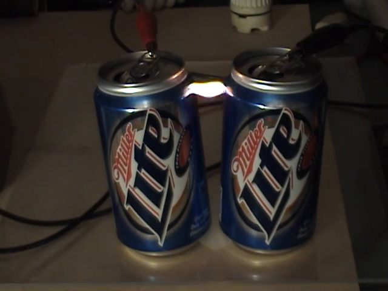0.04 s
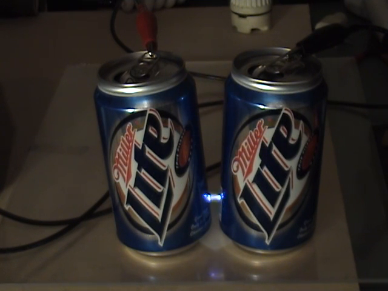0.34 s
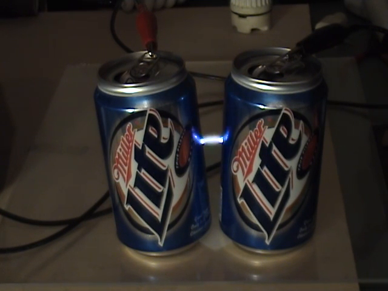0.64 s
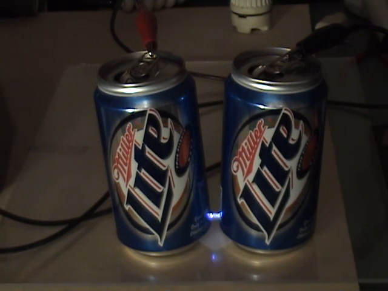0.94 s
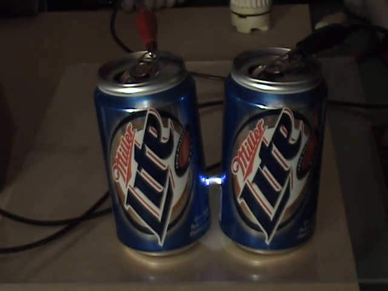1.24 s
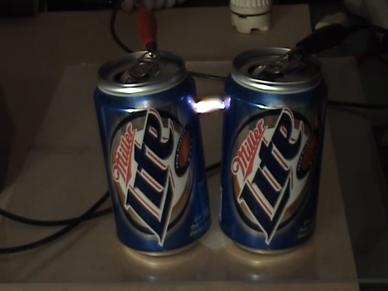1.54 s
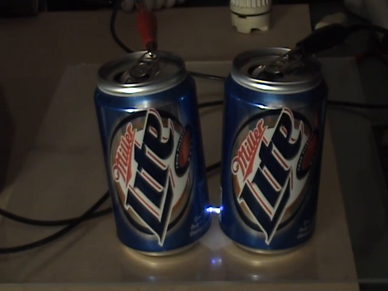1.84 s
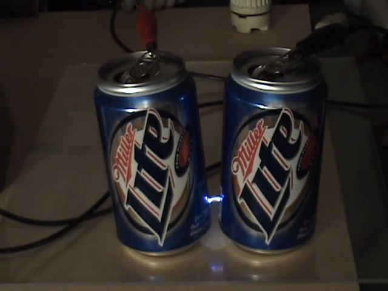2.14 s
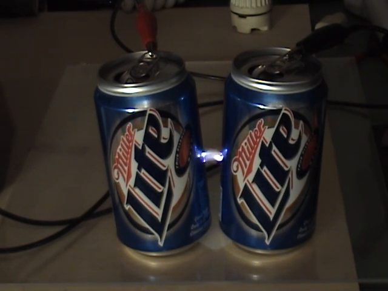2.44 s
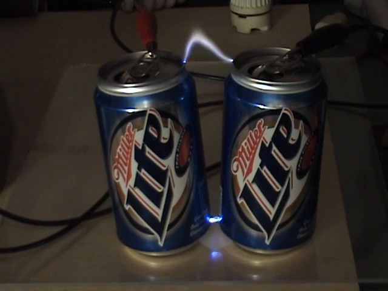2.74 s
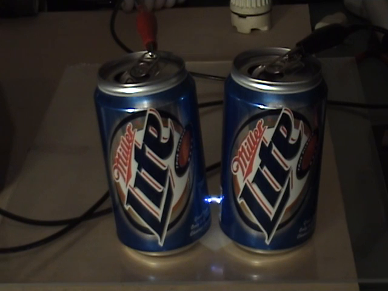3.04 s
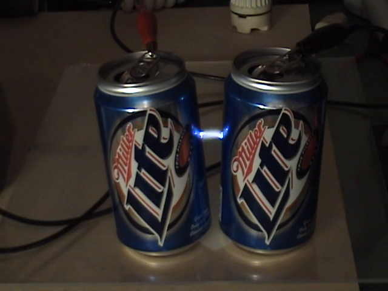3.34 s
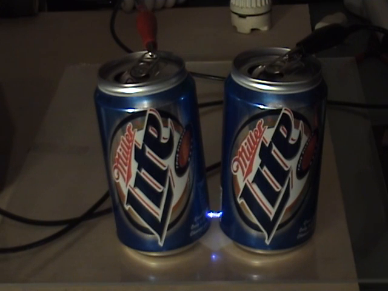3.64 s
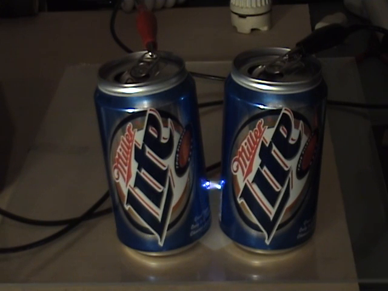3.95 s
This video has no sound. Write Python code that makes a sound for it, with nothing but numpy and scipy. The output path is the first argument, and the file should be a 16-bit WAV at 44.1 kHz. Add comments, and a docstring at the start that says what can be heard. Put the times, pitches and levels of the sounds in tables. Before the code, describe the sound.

A harsh electric arc buzzes, swelling and cutting off with a pop about once a second.

```python
"""A high-voltage mains arc, already high in the widening gap between two metal cans, snaps with a dry pop.
It strikes again at the bottom and climbs, re-ignited in each half cycle by a short burst of sparks.
As it lengthens the sparks spread apart, the buzz grows louder and lower, and a hum swells, until it
snaps again. This repeats about once a second, and the last climb is still under way at the end.
Now and then the cans tick; throughout, a small room with a faint steady rush surrounds it all."""
import sys
import numpy as np
from scipy import signal
from scipy.fft import rfft, irfft
from scipy.io import wavfile

SR = 44100
rng = np.random.default_rng(int(sys.argv[2]) if len(sys.argv) > 2 else 0)


def dump_mix(stems):
    """Bounce the given channels to the path in sys.argv[1] as a 16-bit WAV at rate SR."""
    frames = np.atleast_2d(stems).T  # one column per channel
    limited = np.clip(frames, -1, 1)  # hard clip at full scale
    pcm = np.round(limited * 32767).astype(np.int16)
    wavfile.write(sys.argv[1], SR, pcm)


N = 176400
MAINS_HZ, FIRST_STRIKE_S, BAND_EDGE_HZ = 60.015, .00121, 16050

# Climbs of the arc. Each row: break time in seconds, time scale of the climb in seconds,
# relative level in dB, time to reach full strength in seconds.
CLIMBS = [(0.174, 1, -1.5, 0.55), (0.924, 0.37, 0, 0.2), (1.74, 0.39, 0, 0.18), (2.774, 0.35, .5, 0.24),
          (3.626, 0.35, -.5, 0.21), (4.476, 0.36, 2.5, 0.25)]
# Burst strength along a climb. Each row: height from 0 to 1, gain in dB.
HEIGHT_GAIN = [(0, -2), (.1, -3), (.35, 0), (.65, -2.5), (.85, -1.5), (1, 4)]
# Comb spectrum of a burst. Each row: multiple of the spark rate, gain in dB before depth scaling.
BURST_COMB = [(.2, -10), (.42, -9), (.58, -14), (.68, -6.5), (.74, -11.5), (.88, -3.5), (1.15, 0),
              (1.42, 0), (1.66, -7), (1.9, 0.5), (2.25, -0.5), (2.6, -1), (2.9, -10.5), (3.2, -3),
              (3.6, -6), (4.15, -11), (4.6, -4), (6, -12)]
# Colour of the sparks between the cans. Each row: frequency in Hz, gain in dB.
SPARK_COLOUR = [(100, -22.5), (400, -10), (900, -18.5), (1400, -3.5), (2000, -6), (2300, -5), (2900, -2),
                (4200, -2.5), (5800, 5), (6900, 0.5), (7800, -7), (8500, 3), (9500, 4.5), (10600, -1),
                (11150, 0.5), (11900, -7.5), (12500, -1.5), (14000, -7), (16000, -11)]
# Ticks of the cans. Each row: start in seconds, relative level in dB, centre frequency in Hz.
CAN_TICKS = [(0.4475, -25, 5180), (1.2455, -27, 5080), (2.2224, -13, 3350), (2.2317, -21.5, 3020),
             (3.09, -28.5, 4600)]
# Modes of a can. Each row: frequency in Hz, relative level in dB, time to fall 60 dB in seconds.
CAN_MODES = [(724, 15, 0.098), (1790, 10.5, 0.23), (1930, -2, 0.61), (2051, -1, 0.2), (2380, -14, .12),
             (2860, 15, 0.05), (3200, -10, 0.073), (4086, -25, .14), (4780, 14, 0.22)]
# Early reflections. Each row: delay in milliseconds, left gain in dB, right gain in dB.
REFLECTIONS = [(.76, -52, -39), (3.88, -43, -9.5), (4.12, -49.5, -9), (6.3, -42, -10.5)]
# Decay of the room's tail. Each row: frequency in Hz, time to fall 60 dB in seconds.
TAIL_T60 = [(200, 0.1), (2000, 0.46), (6000, 0.78), (15000, 0.02)]
# Spectrum of the tail. Each row: frequency in Hz, gain in dB.
TAIL_SPECTRUM = [(200, 6.5), (1200, 2.5), (3000, -12.5), (6000, -14), (10000, -10), (15000, -80.5)]
# Spectrum of the room noise. Each row: frequency in Hz, relative spectral density in dB.
RUSH_SPECTRUM = [(25, -10.5), (60, -9.5), (110, -10), (170, -3.5), (260, 1.5), (430, 1), (700, -1.5),
                 (1100, -6), (2200, -12), (4000, -4.5), (8000, -14.5), (16000, -10.5)]
# Likeness of its two channels. Each row: frequency in Hz, correlation from 0 to 1.
RUSH_CORRELATION = [(30, .1), (120, 0.27), (300, 0.9), (600, 0.76), (2000, 1), (16000, 1)]
# Its balance. Each row: frequency in Hz, left minus right level in dB.
RUSH_BALANCE = [(30, -9), (70, 2), (250, 3), (600, 5.5), (1500, 3)]
# Its tones. Each row: frequency in Hz, RMS level in dB.
RUSH_TONES = [(393.5, -56), (1034, -59)]


def amp(db):
    return 10 ** (np.asarray(db) / 20)


def unit_rms(x):
    return x / np.sqrt(np.mean(x ** 2) + 1e-20)


def curve_at(points, hz):
    f, value = np.transpose(points)
    return np.interp(np.log(hz + 1), np.log(f + 1), value)


def add(mix, start_s, sound):
    part = mix[max(round(start_s * SR), 0):][:len(sound)]
    part += sound[:len(part)]


def minimum_phase(gain_db):
    """Causal response: the phase follows from the log gain by the Hilbert transform."""
    return np.exp(np.conj(signal.hilbert(np.log(amp(gain_db)))))


def half_cycles():
    """An AC arc re-ignites twice a cycle. Gives each strike's time, height, age, level and break flag."""
    t = np.arange(FIRST_STRIKE_S, N / SR, 1 / (2 * MAINS_HZ))
    break_s, scale_s, climb_db, warm_s = np.transpose(CLIMBS)
    strike = np.arange(len(t))
    last_strikes = np.round((break_s - FIRST_STRIKE_S) * 2 * MAINS_HZ)
    climb = np.searchsorted(last_strikes, strike)
    height = np.exp(-(abs(break_s[climb] - t) / scale_s[climb]) ** 1.805)
    age = t - np.r_[-1, break_s][climb]
    fresh_db = -14.5 * np.clip(1 - age / warm_s[climb], 0, 1)  # a new arc starts weak
    level_db = climb_db[climb] + np.interp(height, *np.transpose(HEIGHT_GAIN)) + fresh_db
    return t, height, age, level_db, np.isin(strike, last_strikes)


def arc_buzz(bottom_ms=.087, top_ms=.372, settle_s=.067, treble_lag_s=.000312, comb_depth=1.15, size=256):
    """Interference: the sparks of a burst form a comb spectrum, which falls as their spacing grows."""
    t, height, age, level_db, breaks = half_cycles()
    spacing_noise, level_noise, time_noise = rng.standard_normal((3, len(t)))
    unsteady = height ** 4
    spacing_ms = bottom_ms + (top_ms - bottom_ms) * height ** 1.475
    spacing_ms *= 1 - .23 * np.exp(-age / settle_s)
    spacing_ms *= 1 + (.02 + .045 * unsteady) * spacing_noise
    polarity_ms = .066 * (np.arange(len(t)) % 2)  # every other burst lags
    lead_ms = 1.9 * (spacing_ms - bottom_ms)  # a long arc fires earlier
    starts = t + (polarity_ms + .018 * time_noise - lead_ms) / 1000
    misfires = rng.random(len(t)) < .03
    flicker_db = (.85 + 1.5 * unsteady) * level_noise - 4.5 * misfires
    level_db += np.where(breaks, 3, flicker_db)  # the burst at a break is stronger
    hz, bursts = np.fft.fftfreq(size, 1 / SR), np.zeros(N)
    for start, spacing_s, db in zip(starts, spacing_ms / 1000, level_db):
        frame_s = (round(start * SR) - size // 16) / SR
        sputter_db = 2 * np.interp(abs(hz), np.linspace(0, BAND_EDGE_HZ, 12), rng.standard_normal(12))
        comb_db = comb_depth * np.interp(abs(hz) * spacing_s, *np.transpose(BURST_COMB))
        delay_s = start - frame_s + treble_lag_s * abs(hz) / BAND_EDGE_HZ / 2
        spectrum = minimum_phase(comb_db + sputter_db) * np.exp(-2j * np.pi * hz * delay_s)
        burst = np.fft.ifft(spectrum * (abs(hz) < BAND_EDGE_HZ)).real
        add(bursts, frame_s, amp(db) * unit_rms(burst))
    colour_db = curve_at(SPARK_COLOUR, abs(np.fft.fftfreq(2048, 1 / SR)))
    colour_taps = np.fft.ifft(minimum_phase(colour_db)).real[:1024]
    return amp(-26) * unit_rms(signal.oaconvolve(bursts, colour_taps)[:N])


def break_pops(pop_ms=.158, puff_ms=2.1):
    """Compression, then rarefaction: each break gives a dry pop and a slower, soft puff of air."""
    out, ms = np.zeros(N), np.arange(1000) * 1000 / SR
    pop = amp(-11.5) * (1 - ms / pop_ms) * np.exp(-ms / pop_ms)
    puff = amp(-30.5) * (1 - ms / puff_ms) * np.exp(-ms / puff_ms)
    strike_s, *_, breaks = half_cycles()
    for start in strike_s[breaks]:
        add(out, start, pop + puff)
    return out


def arc_hum(bottom_db=-74, top_db=-60):
    """The hot channel pulses with the current at twice the mains frequency, more as it lengthens."""
    strike_s, height = half_cycles()[:2]
    t = np.arange(N) / SR
    level_db = np.interp(t, strike_s, bottom_db + (top_db - bottom_db) * np.sqrt(height))
    return amp(level_db) * unit_rms(np.cos(2 * np.pi * 2 * MAINS_HZ * (t - FIRST_STRIKE_S)))


def can_ticks(width_octaves=.66, crack_s=.01, rattle_s=.032):
    """Free vibration: a short crack leaves the thin metal ringing in its damped modes."""
    out, t = np.zeros(N), np.arange(SR // 2) / SR
    hz = np.fft.rfftfreq(len(t), 1 / SR)
    envelope = np.exp(-t / crack_s) + amp(-3) * np.exp(-t / rattle_s)
    high_pass = signal.butter(2, 600, 'high', fs=SR, output='sos')
    for start, db, centre_hz in CAN_TICKS:
        band = lambda f: np.exp(-.5 * (np.log2((f + 1) / centre_hz) / width_octaves) ** 2)
        crack = unit_rms(irfft(rfft(rng.standard_normal(len(t))) * band(hz))) * envelope
        ring = np.zeros(len(t))
        for mode_hz, mode_db, t60 in CAN_MODES:
            drive = max(np.sqrt(band(mode_hz)), .15) * rng.choice([-1, 1])
            ring += drive * amp(mode_db - 60 * t / t60) * np.sin(2 * np.pi * mode_hz * t)
        add(out, start, amp(db) * .5 * signal.sosfilt(high_pass, crack + amp(-18) * ring))
    return out


def room(source, width=.24):
    """Reverberation: direct sound, a few near reflections and a diffuse tail that decays exponentially."""
    hz, t, noise = signal.stft(rng.standard_normal((2, SR // 2)), SR, nperseg=256)
    decay = amp(-60 * t / curve_at(TAIL_T60, hz)[:, None])
    energy = (decay ** 2).mean(1, keepdims=True) * SR / 2
    decay *= amp(curve_at(TAIL_SPECTRUM, hz))[:, None] / np.sqrt(energy)
    mid, side = signal.istft(noise * decay, SR, nperseg=256)[1]
    response = np.array([mid + width * side, mid - width * side])
    response[:, 0] = 1  # direct sound
    for ms, left_db, right_db in REFLECTIONS:
        response[:, round(ms * SR / 1000)] += amp([left_db, right_db])
    return signal.fftconvolve(source[None], response, axes=1)[:, :N]


def room_rush():
    """Stationary noise, partly correlated between left and right, with two faint pure tones."""
    hz, t = np.fft.rfftfreq(N, 1 / SR), np.arange(N) / SR
    left, independent = rfft(rng.standard_normal((2, N)))
    correlation = np.clip(curve_at(RUSH_CORRELATION, hz), -1, 1)
    right = correlation * left + np.sqrt(1 - correlation ** 2) * independent
    tilt = amp(curve_at(RUSH_BALANCE, hz) / 2)
    noise = irfft(np.array([left * tilt, right / tilt]) * amp(curve_at(RUSH_SPECTRUM, hz)), N)
    tones = sum(amp(db) * unit_rms(np.sin(2 * np.pi * f * t)) for f, db in RUSH_TONES)
    return amp(-41) * unit_rms(noise) + tones


def scene():
    """Superposition: buzz and ticks reverberate; pops, hum and rush add directly."""
    return room(arc_buzz() + can_ticks()) + break_pops() + arc_hum() + room_rush()


def record(dry):
    """Clipping at full scale, then band limiting by a linear-phase low-pass filter."""
    low_pass = signal.firwin(511, BAND_EDGE_HZ, window=("kaiser", 8), fs=SR)
    return signal.oaconvolve(np.clip(dry, -1, 1), low_pass[None], "same")


dry = scene()
out = record(dry)
dump_mix(out)
```